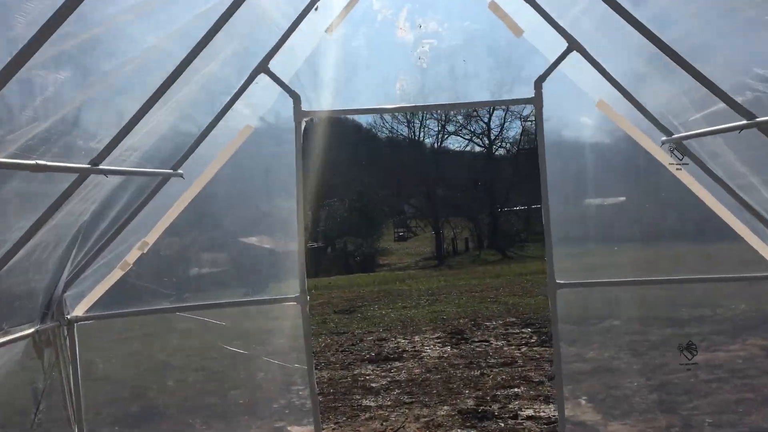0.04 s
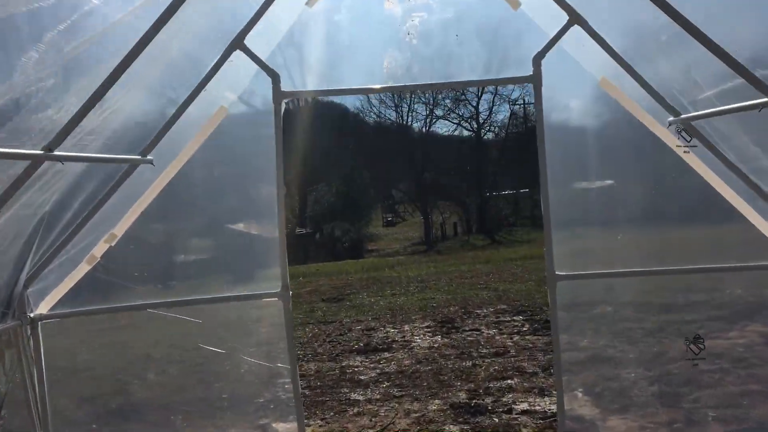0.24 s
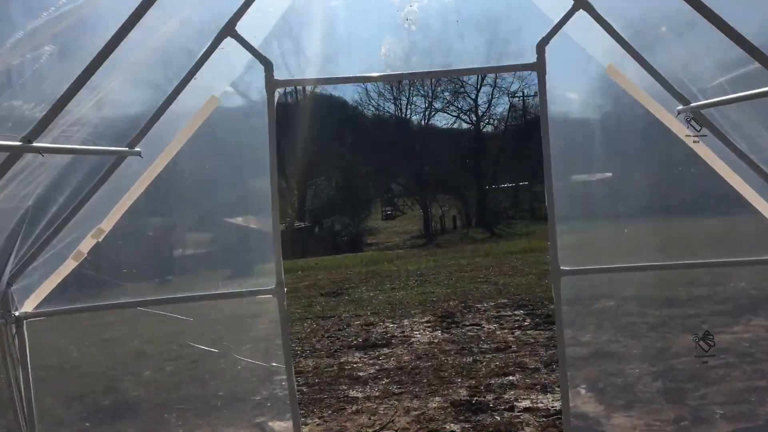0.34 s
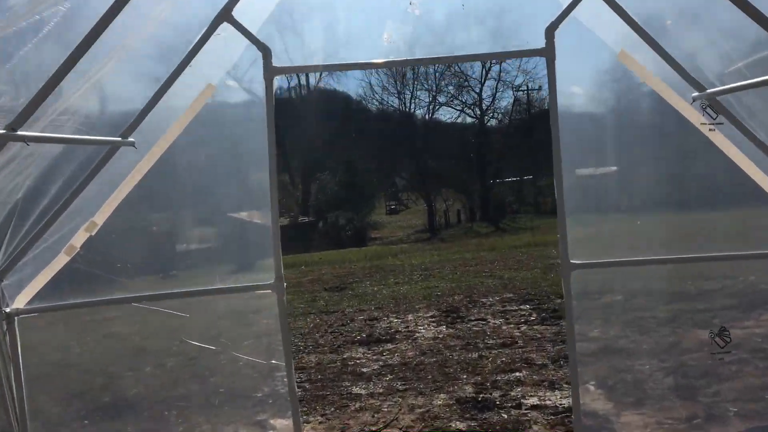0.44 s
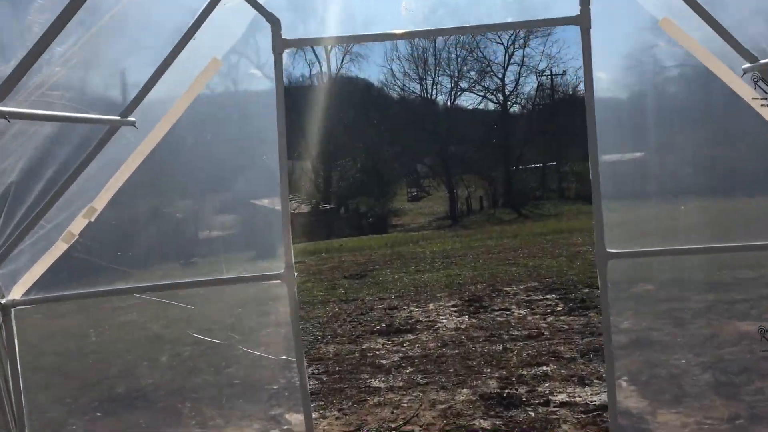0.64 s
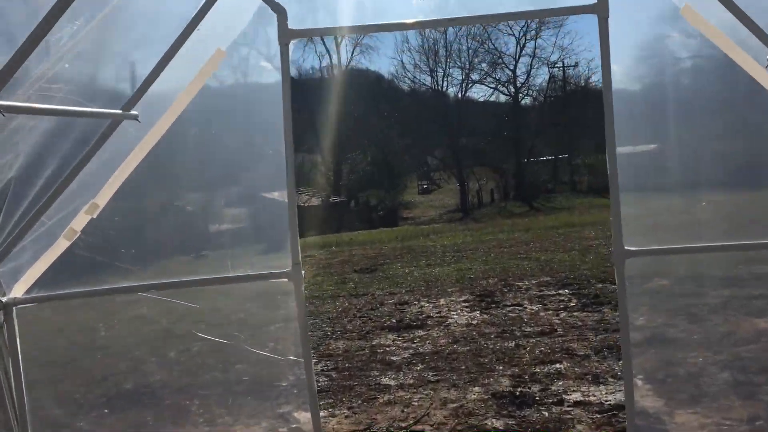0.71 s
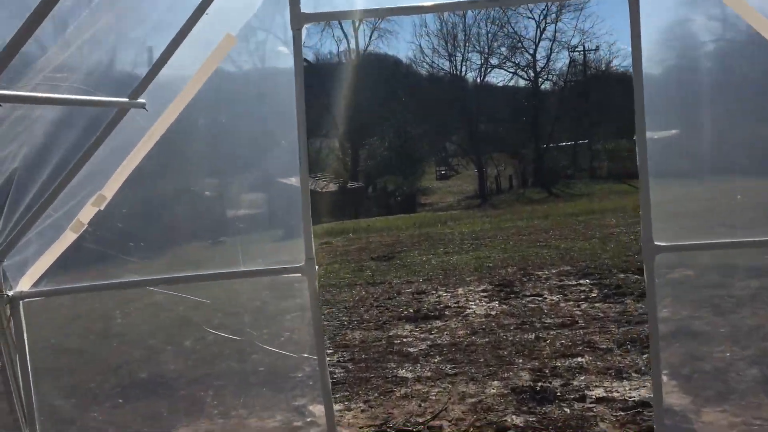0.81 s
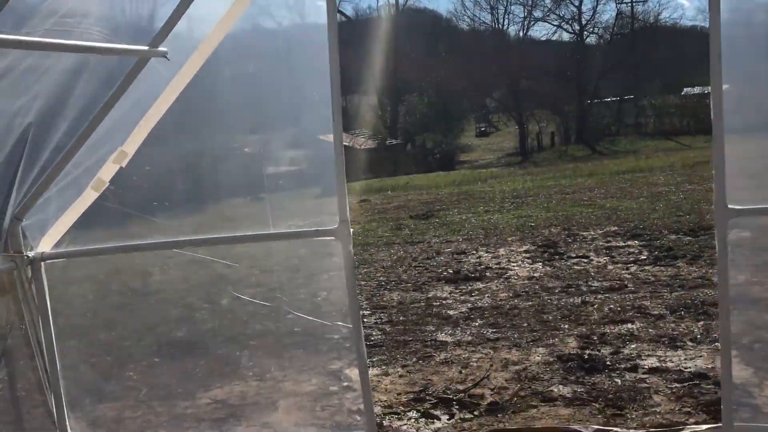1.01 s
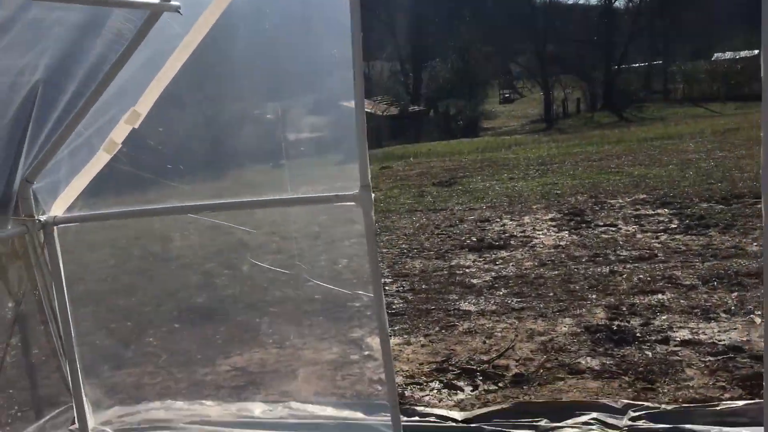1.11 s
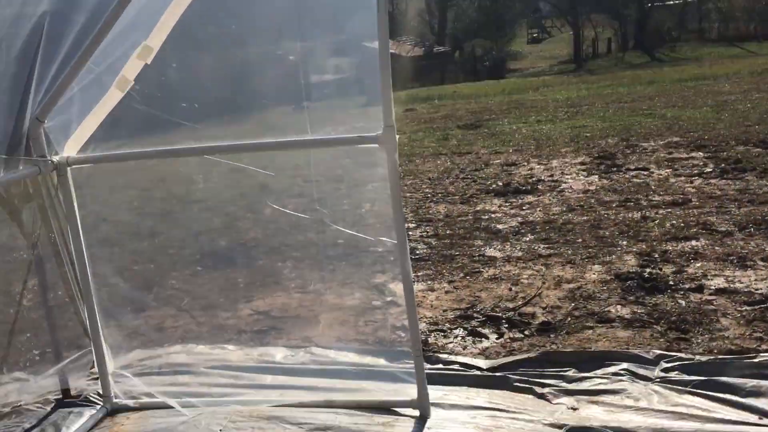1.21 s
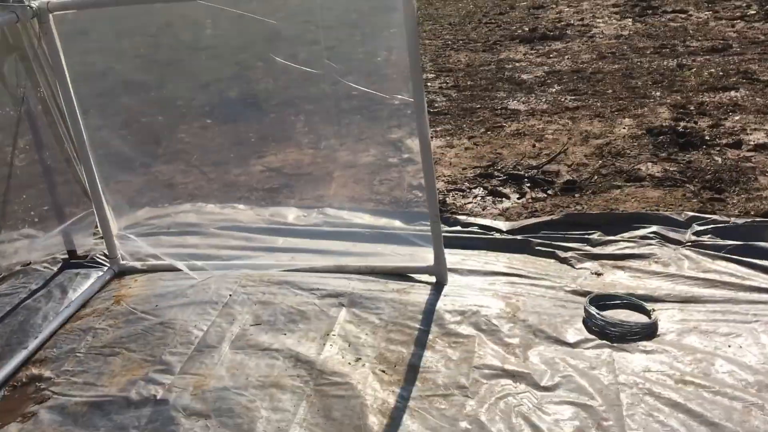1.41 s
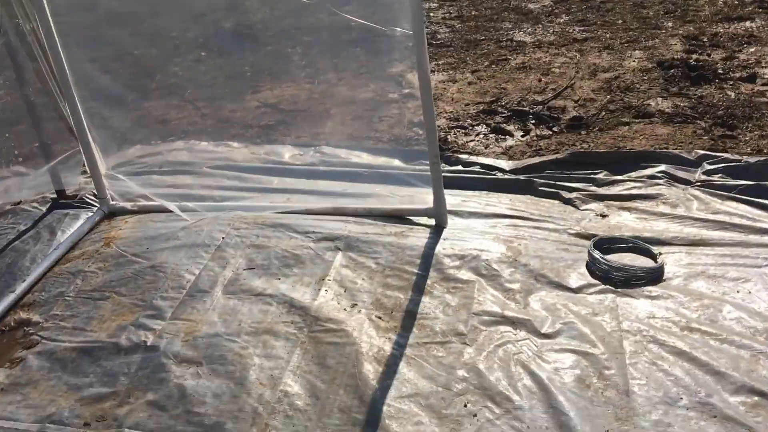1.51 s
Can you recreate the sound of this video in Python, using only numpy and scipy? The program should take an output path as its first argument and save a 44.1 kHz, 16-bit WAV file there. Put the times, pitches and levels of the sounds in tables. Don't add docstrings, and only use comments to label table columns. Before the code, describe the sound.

Plastic sheeting of a greenhouse crackles and rustles in quick bursts, strongest at the start and just past the middle, with dull flaps and sharp snaps between; low wind thumps hit the phone microphone, over faint outdoor air.

```python
import sys
import numpy as np
from scipy import signal
from scipy.fft import rfft, irfft
from scipy.io import wavfile
from scipy.ndimage import uniform_filter1d

SR = 44100
rng = np.random.default_rng(int(sys.argv[2]) if len(sys.argv) > 2 else 0)


def volts_from_decibels(level):
    exponent = np.asarray(level, float) / 20
    return 10 ** exponent


def transcribe(signal):
    frames = np.atleast_2d(signal).T
    limited = np.clip(frames, -1, 1)
    pcm = np.round(limited * 32767).astype(np.int16)
    wavfile.write(sys.argv[1], SR, pcm)


N = 68355


def level(x, db):
    return x * volts_from_decibels(db) / np.sqrt(np.mean(x ** 2))


def band(x, hz, width):
    return signal.lfilter(*signal.iirpeak(hz, hz / width, SR), x)


def walk(rate):
    hold = int(SR / rate)
    steps = np.repeat(rng.standard_normal(N // hold + 1), hold)
    return 1.05 * uniform_filter1d(uniform_filter1d(steps, hold), hold)[:N]


def coloured(points, lo_hz, top_hz, flicker_db, rate):
    f = np.fft.rfftfreq(N, 1 / SR) + 1
    hz_points, db_points = np.array(points).T
    shape = volts_from_decibels(np.interp(np.log(f), np.log(hz_points), db_points, left=-60))
    out = 0
    for hz in np.exp(np.arange(np.log(lo_hz), np.log(top_hz), np.log(2) / 2)):
        part = np.cos(np.pi * np.clip(np.log2(f / hz), -0.5, 0.5))
        noise = irfft(rfft(rng.standard_normal(N)) * shape * part, N)
        out = out + noise * volts_from_decibels(flicker_db * walk(rate))
    return level(out, 0)


def swell(t, start, rise, hold, fade_db_s):
    fading = np.clip(t - start - rise - hold, 0, 9)
    return np.clip((t - start) / rise, 0, 1) * volts_from_decibels(-fade_db_s * fading)


def power_sum(swells):
    return np.sqrt(sum(s ** 2 for s in swells))


def crinkle(body):
    clicks_per_s, spread_db = 6000, 3.2
    out = 0
    for hz, width, db in body:
        hit = rng.random(N) < clicks_per_s / len(body) / SR
        size = volts_from_decibels(spread_db * np.clip(rng.exponential(size=N), 0, 4))
        clicks = hit * size * np.sign(rng.standard_normal(N))
        ringing = band(band(clicks, hz, width * 1.14), hz, width * 1.14)
        out = out + level(ringing, db)
    return level(out * volts_from_decibels(1.2 * walk(150)), 0)


# (start [s], rise [s])
RUSTLE_ONSETS = [(.004, .01), (.06, .006), (.141, .003), (.532, .016), (.6, .004), (.808, .006),
                 (1.169, .01), (1.227, .004), (1.325, .015)]
# (hiss level [dB], crinkle level [dB], hold [s])
RUSTLE_STRENGTHS = [(-51.5, -49, 0.027), (-53, -44.5, 0.038), (-79, -55, 0.0071), (-56.5, -49.5, 0.0097),
                    (-48, -46, 0.024), (-80, -60.5, 0.0085), (-55, -50, 0.0077), (-57.5, -51.5, 0.0073),
                    (-58.5, -61, 0.063)]
# (frequency [Hz], width [Hz], level [dB])
SHEET_BODY = [(1040, 990, -8), (1500, 1050, -2), (2050, 1200, -4.5), (2550, 1640, -4.5), (3530, 1450, -11)]


def crinkles(t):
    rustles = np.hstack([RUSTLE_ONSETS, RUSTLE_STRENGTHS])
    busy = power_sum(volts_from_decibels(db) * swell(t, start, rise, hold, 275) for start, rise, _, db, hold in rustles)
    return busy * crinkle(SHEET_BODY)


# (frequency [Hz], density [dB per Hz])
HISS_COLOUR = [(410, -10), (700, 0), (931, -10.5), (1360, -3.5), (1920, -1), (3070, -7.5), (3730, -7),
               (8990, -13), (15500, -23)]


def sliding_hiss(t):
    lag, jump, fade_db_s = 3.57, 0.69, 73.5
    swells = []
    for start, rise, db, _, hold in np.hstack([RUSTLE_ONSETS, RUSTLE_STRENGTHS]):
        slow = swell(t, start, rise * lag, hold, fade_db_s)
        instant = swell(t, start, 0.00069, rise * lag + hold, fade_db_s)
        swells.append(volts_from_decibels(db) * slow ** (1 - jump) * instant ** jump)
    return power_sum(swells) * coloured(HISS_COLOUR, 685, 16000, 3.0, 30.34)


# (start [s], rise [s], level [dB], hold [s])
FLAP_EVENTS = [
    (0.108, 0.0031, -59, 0.0077),
    (0.228, 0.02, -59, 0.061),
    (0.346, 0.0059, -50, 0.0086),
    (0.385, 0.0023, -50, 0.0093),
    (0.557, 0.0049, -57.5, 0.0047),
    (.95, 0.0067, -67, 0.019),
    (1.027, 0.0031, -56.5, 0.037),
    (1.115, 0.016, -62, 0.024),
]
# (frequency [Hz], width [Hz], level [dB])
FLAP_BODY = [(590, 290, 4), (1020, 460, 3), (1400, 590, -12)]


def flaps(t):
    loose = power_sum(volts_from_decibels(db) * swell(t, start, rise, hold, 260) for start, rise, db, hold in FLAP_EVENTS)
    return loose * crinkle(FLAP_BODY)


# (frequency [Hz], width [Hz], level [dB])
FOLD_TONES = [(2000, 280, -5), (3800, 380, -8.5), (1400, 300, -8)]


def dragged_fold(t):
    drag = 0
    for hz, width, db in FOLD_TONES:
        friction = rng.standard_normal(N) * volts_from_decibels(2.3 * walk(90))
        drag = drag + level(band(friction, hz, width), db)
    return drag * volts_from_decibels(-53) * swell(t, 1.17, 0.072, 0.11, 59)


# (time [s], peak level [dB], pitch [Hz], ring t60 [s])
CREASES = [(0.011, -19.5, 1580, 0.004), (.064, -30.5, 2400, 0.021), (.088, -30, 2320, 0.0043),
           (.113, -30.5, 1035, 0.02), (.1425, -19.5, 1200, 0.0057), (.39, -34.5, 1400, 0.024),
           (0.469, -47, 4000, 0.013), (0.532, -32, 1640, 0.0084), (.55, -39, 2350, 0.031),
           (.568, -33, 754, 0.022), (0.602, -32, 1290, 0.029), (.607, -28.5, 1500, .015),
           (0.612, -34, 1870, 0.017), (.98, -29.5, 1500, 0.0036), (1.031, -59, 900, 0.017),
           (1.182, -30, 1547, 0.025), (1.23, -28, 1980, 0.026), (1.333, -33.5, 1400, 0.012),
           (1.341, -35, 1400, 0.0089)]


def snaps(t):
    rise_s = 0.0004
    out = np.zeros(N)
    for start, db, hz, t60 in CREASES:
        above, below = 1.4 + 0.23 * rng.random(), 0.7 + 0.18 * rng.random()
        u = np.clip(t - start, 0, 1)
        phase = 2 * np.pi * hz * u
        ring = np.sin(phase) + 0.3 * np.sin(above * phase) + 0.26 * np.sin(below * phase)
        out += volts_from_decibels(db) * 0.55 * ring * (1 - np.exp(-u / rise_s)) * np.exp(-np.log(1000) * u / t60)
    return out


# (time [s], peak level [dB], centre [Hz])
TICK_EVENTS = [
    (.064, -42, 3500),
    (.303, -56, 9000),
    (.534, -55, 9000),
    (.601, -50, 5000),
    (.815, -50, 2300),
    (.98, -45, 2200),
    (1.135, -47, 4000),
    (1.171, -45, 4500),
    (1.176, -47, 6000),
]


def ticks(t):
    decay_s = 0.0012
    out = np.zeros(N)
    for start, db, hz in TICK_EVENTS:
        decay = (t > start) * np.exp(-np.clip(t - start, 0, 1) / decay_s)
        burst = 2 * volts_from_decibels(db) * decay * rng.standard_normal(N)
        out += band(band(burst, hz, hz), hz, hz * 1.5)
    return out


def house_echo(near, t):
    t60_s, gap_s, echo_db = 0.079, 0.003, -19
    u = t[:SR // 4]
    tail = rng.standard_normal(len(u)) * np.exp(-np.log(1000) * u / t60_s) * (u > gap_s)
    echo = level(tail, echo_db) / np.sqrt(len(u))
    return signal.fftconvolve(near, echo)[:N]


# (time [s], level [dB])
GUST_LEVELS = [(0.0, -48), (0.224, -48.5), (0.24, -50), (0.4, -36), (0.492, -38.5), (0.512, -50),
               (0.616, -38), (0.702, -28), (0.724, -45.5), (0.866, -51.5), (0.922, -44), (1.144, -55.5),
               (1.178, -43), (1.55, -58)]
# (frequency [Hz], level [dB])
RUMBLE_COLOUR = [(30, -5.5), (45, -4.5), (62, -5), (90, -8.5), (140, -9.5), (210, -24.5), (320, -25),
                 (500, -40.5)]


def wind_rumble(t):
    times, levels = np.array(GUST_LEVELS).T
    gust_db = np.minimum(np.interp(t, times, levels) - 1, -37)
    return coloured(RUMBLE_COLOUR, 24.73, 600, 5, 22.08) * volts_from_decibels(gust_db)


# (time [s], peak level [dB], ring [Hz], length [s], push 1 or suck -1)
EDDY_EVENTS = [(0.049, -44.5, 68.5, 0.027, 1), (0.182, -39, 77.5, 0.016, 1), (0.213, -35, 51, .025, -1),
               (0.322, -28, 54.4, .02, 1), (0.358, -31.5, 132, 0.0081, -1), (0.377, -23.5, 63, 0.0091, 1),
               (.411, -20, 84.5, .011, 1), (.449, -28.5, 127, 0.009, 1), (0.443, -26, 305, 0.0017, 1),
               (0.461, -24.5, 112, 0.0072, 1), (0.478, -24.5, 59.4, 0.031, 1), (.497, -35, 130, 0.003, 1),
               (0.54, -33, 62, .022, 1), (0.574, -33.5, 63, .02, 1), (0.615, -35.5, 60, .018, 1),
               (.6515, -26.5, 155, 0.0095, -1), (0.694, -18, 67, 0.015, -1), (.693, -25, 201, 0.0027, 1),
               (0.663, -29.5, 55.3, 0.031, 1), (0.767, -34, 61.6, 0.034, -1), (0.936, -38, 67.6, 0.01, 1),
               (1.182, -37.5, 59, 0.019, -1), (1.242, -39.5, 64.5, 0.011, -1),
               (1.335, -38.5, 59.4, 0.019, -1)]


def wind_eddies(t):
    out = np.zeros(N)
    for centre, db, hz, length, way in EDDY_EVENTS:
        puff = np.exp(-2 * ((t - centre) / length) ** 2)
        out += np.sign(way) * volts_from_decibels(db) * puff * np.cos(2 * np.pi * hz * (t - centre))
    return out


# (frequency [Hz], density [dB per Hz])
AIR_COLOUR = [(88, -55), (150, -4.5), (179, -4), (381, -7.5), (656, -17), (1110, -15.5), (2980, -25),
              (11800, -35.5), (15500, -40)]


def outdoor_air():
    return volts_from_decibels(-56) * coloured(AIR_COLOUR, 157.3, 16000, 3.3, 11.53)


def scene():
    t = np.arange(N) / SR
    rustling = crinkles(t) + sliding_hiss(t) + flaps(t) + dragged_fold(t)
    near = rustling + snaps(t) + ticks(t)
    wind = wind_rumble(t) + wind_eddies(t)
    mix = near + house_echo(near, t) + wind + outdoor_air()
    return mix[None]


def band_limit(x):
    return signal.sosfilt(signal.butter(12, 15700, fs=SR, output="sos"), x)


def record(dry):
    bass_cut = signal.butter(2, 25, "high", fs=SR, output="sos")
    top_cut = signal.ellip(10, 0.3, 70, 15770, fs=SR, output="sos")
    x = signal.sosfilt(top_cut, signal.sosfilt(bass_cut, dry))
    return band_limit(x)


dry = scene()
out = record(dry)
transcribe(out)
```